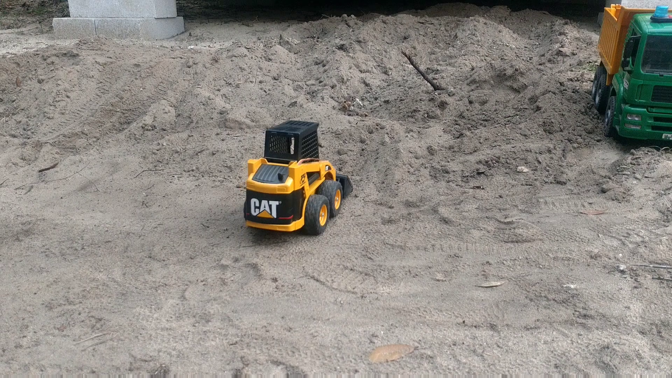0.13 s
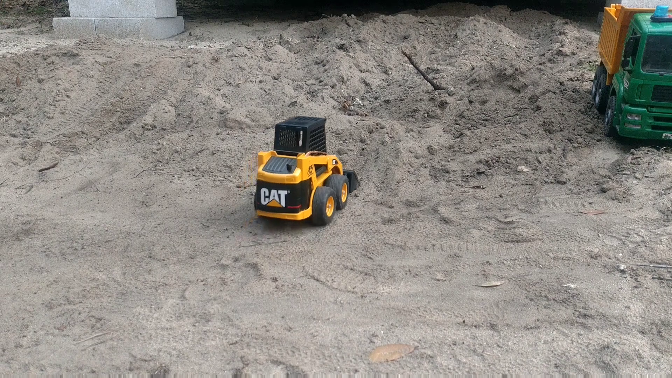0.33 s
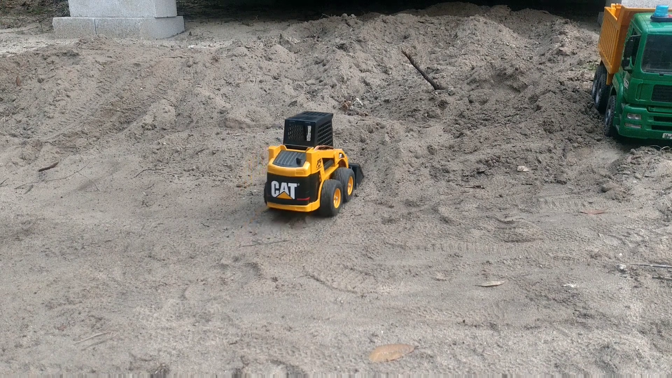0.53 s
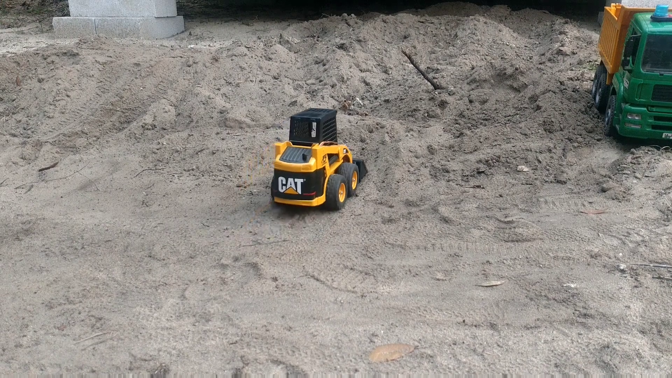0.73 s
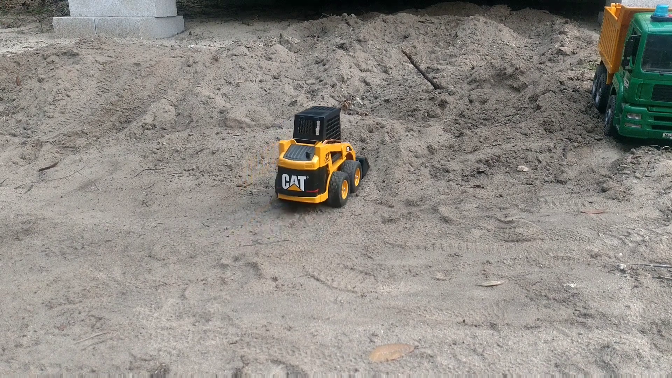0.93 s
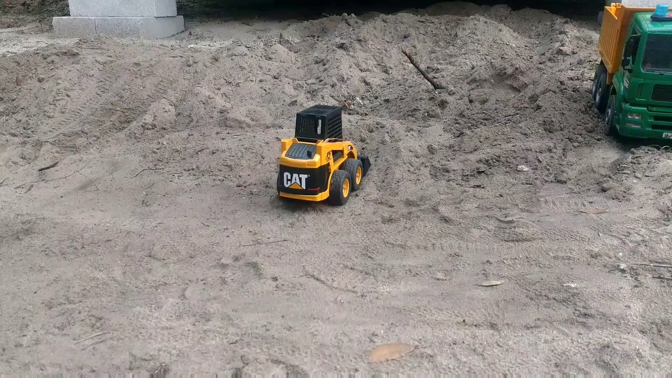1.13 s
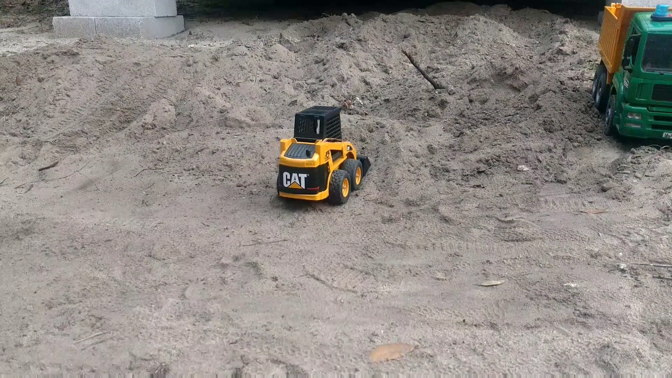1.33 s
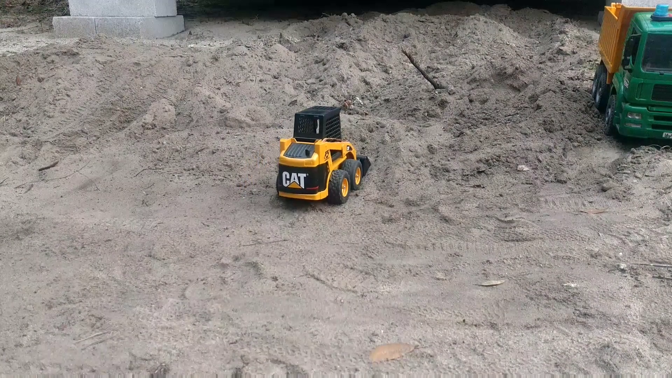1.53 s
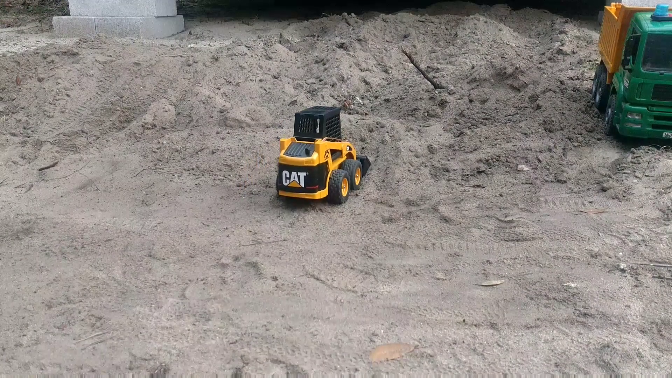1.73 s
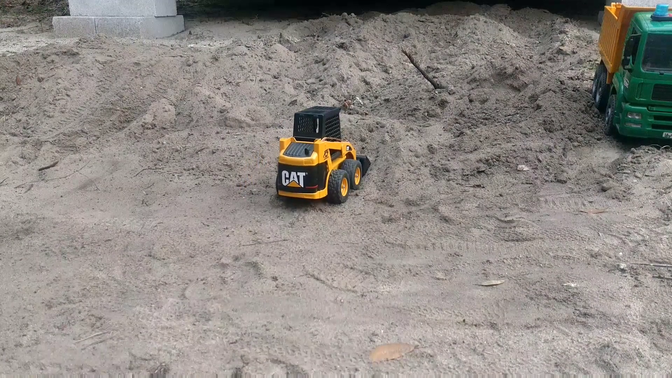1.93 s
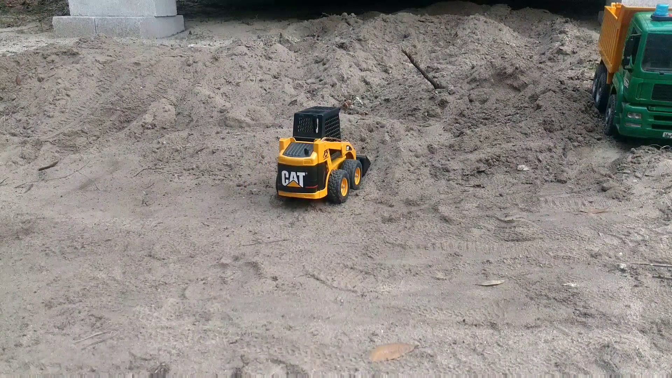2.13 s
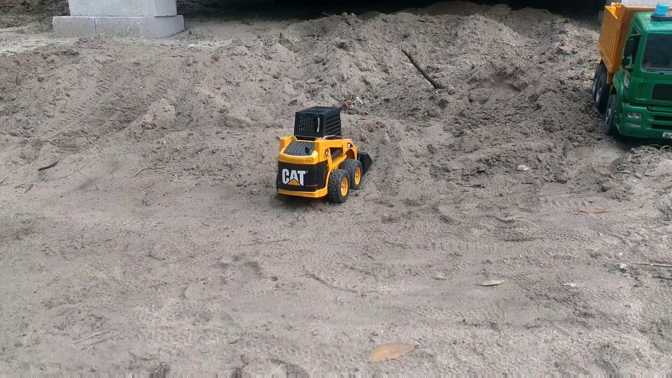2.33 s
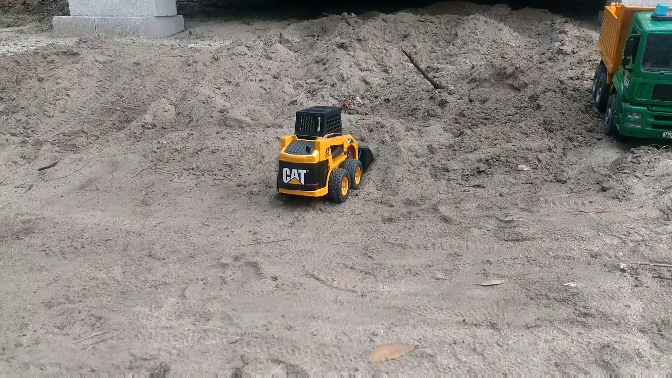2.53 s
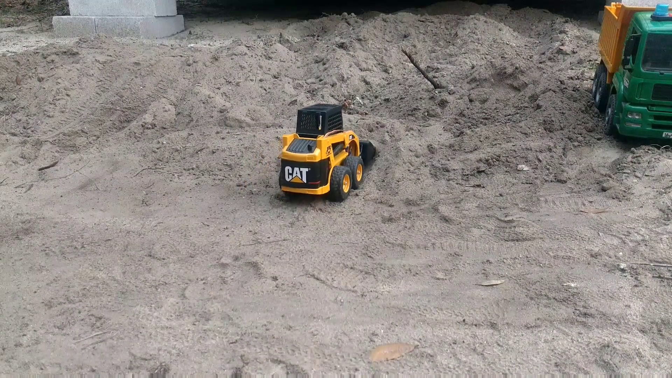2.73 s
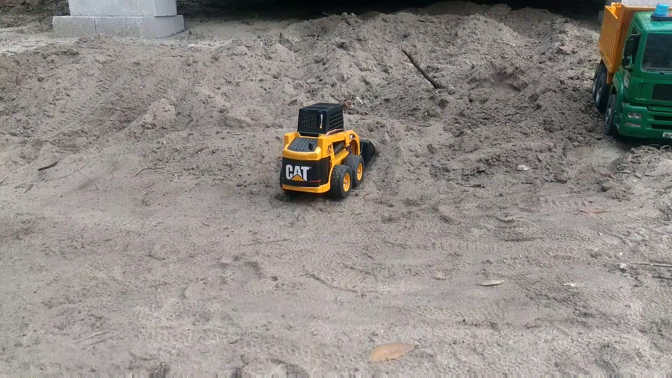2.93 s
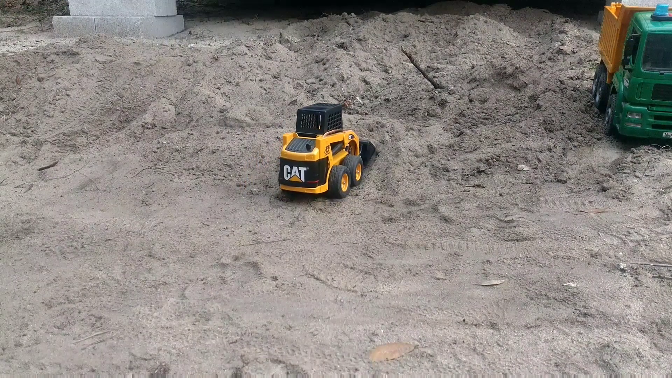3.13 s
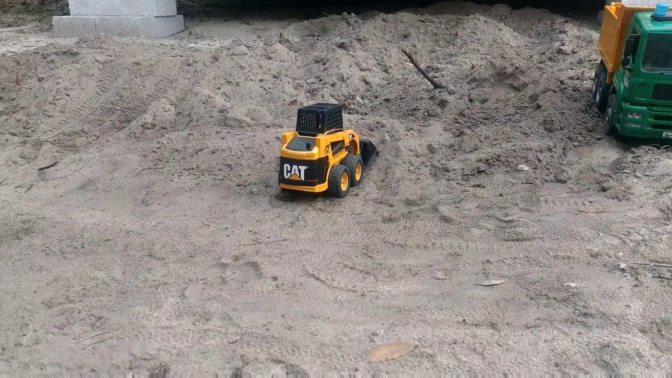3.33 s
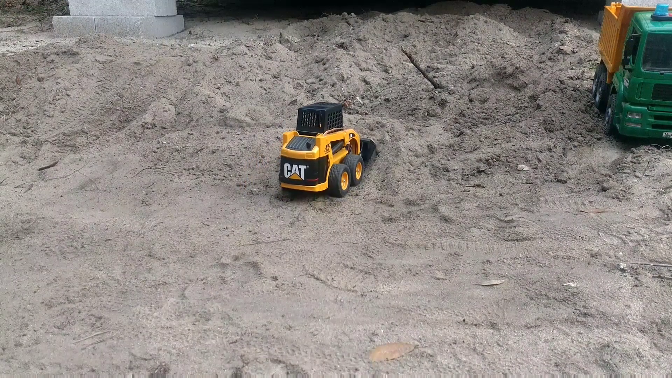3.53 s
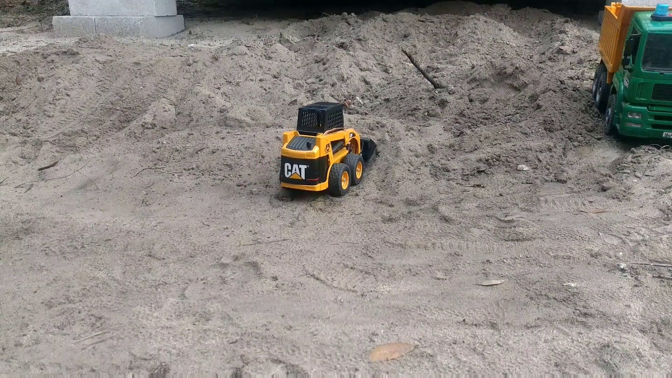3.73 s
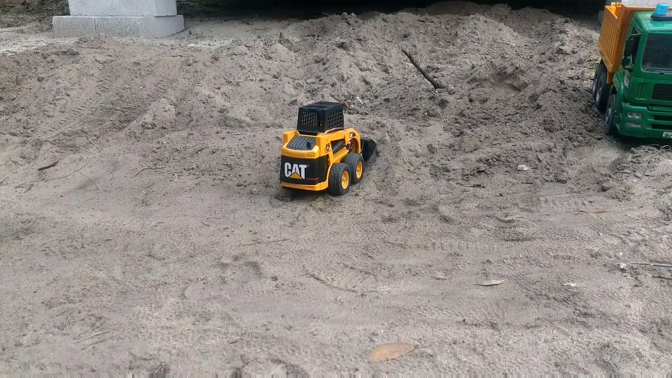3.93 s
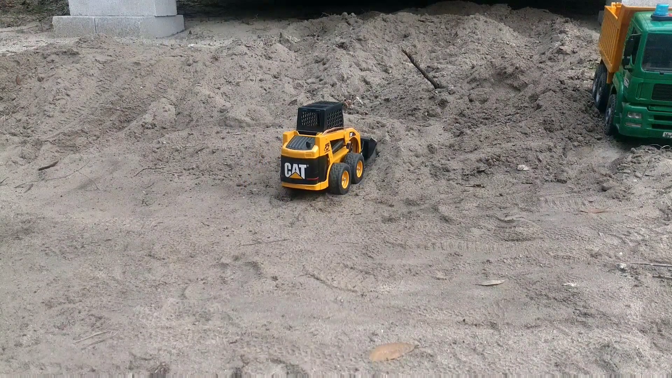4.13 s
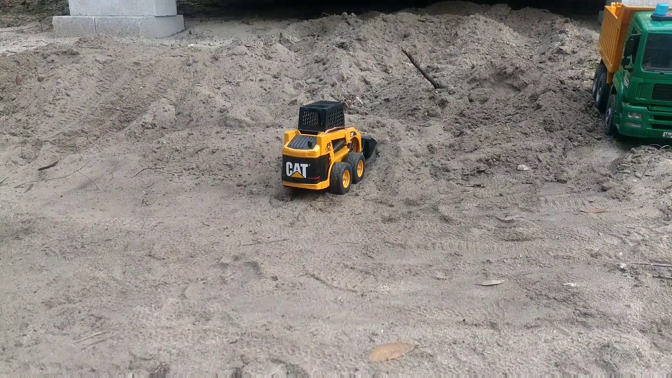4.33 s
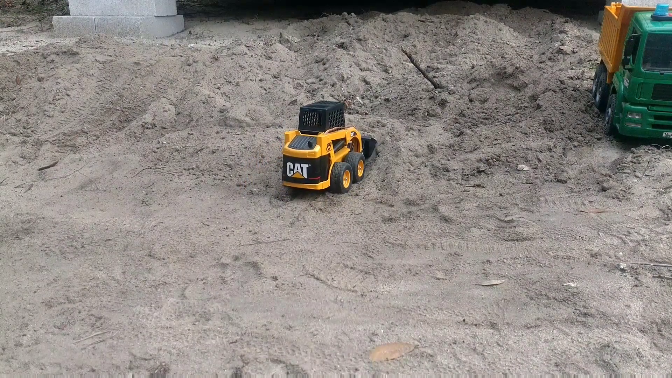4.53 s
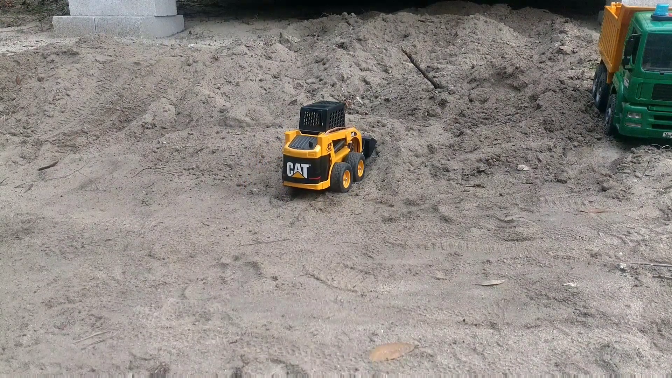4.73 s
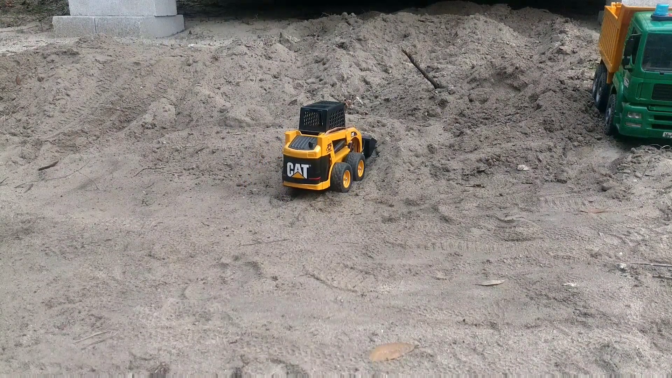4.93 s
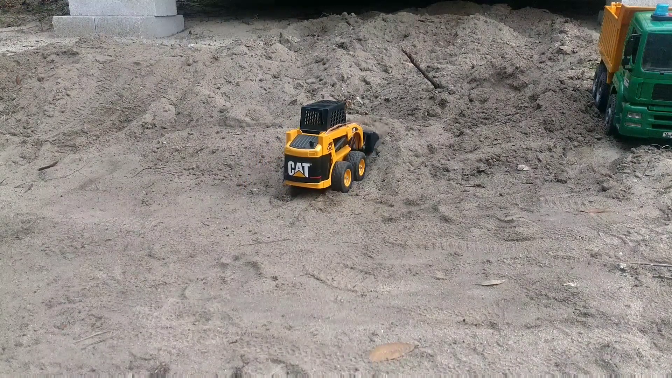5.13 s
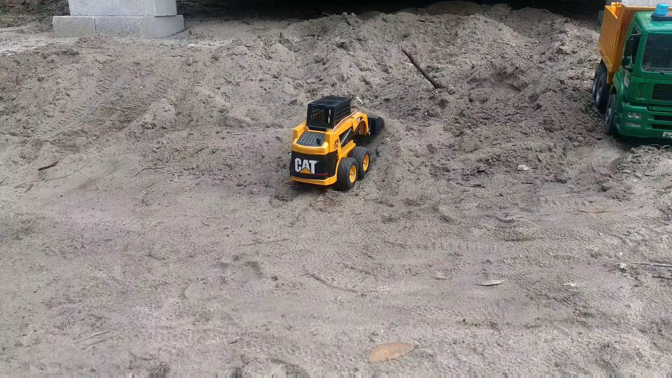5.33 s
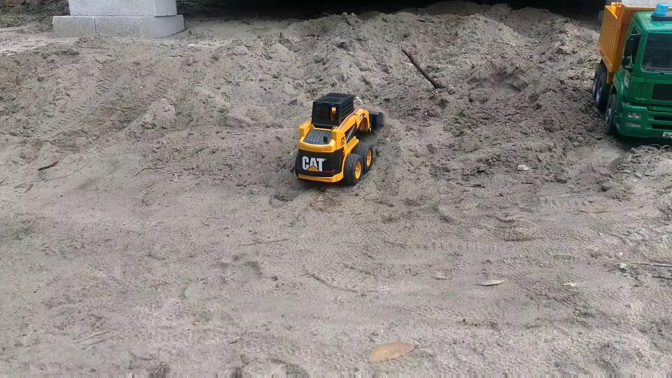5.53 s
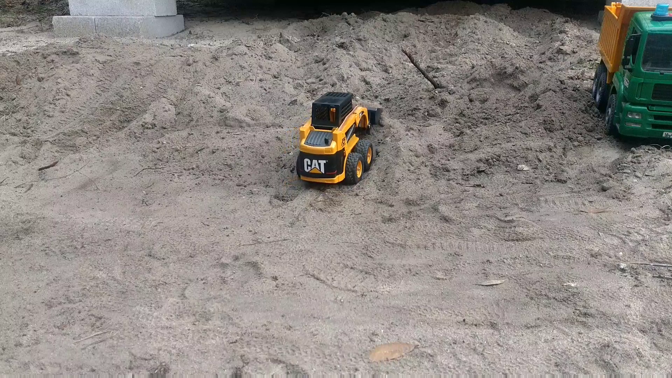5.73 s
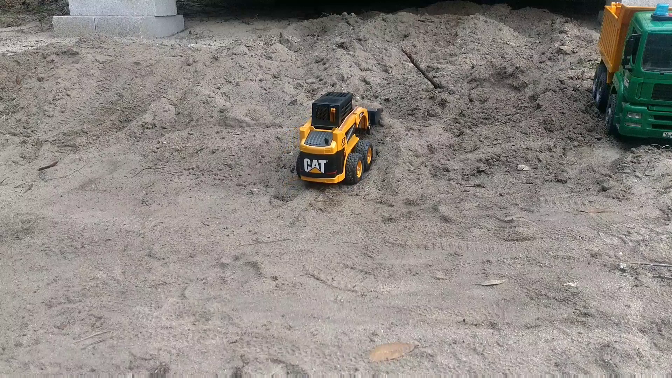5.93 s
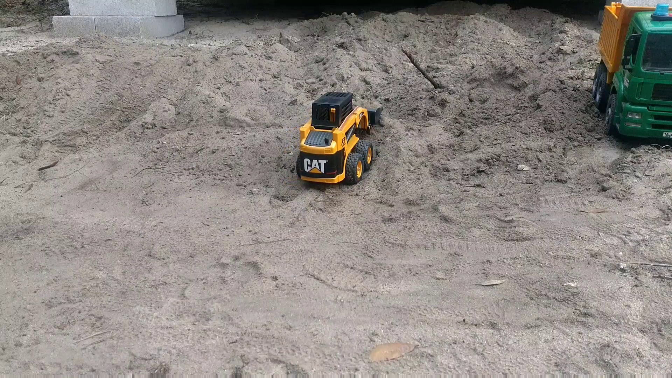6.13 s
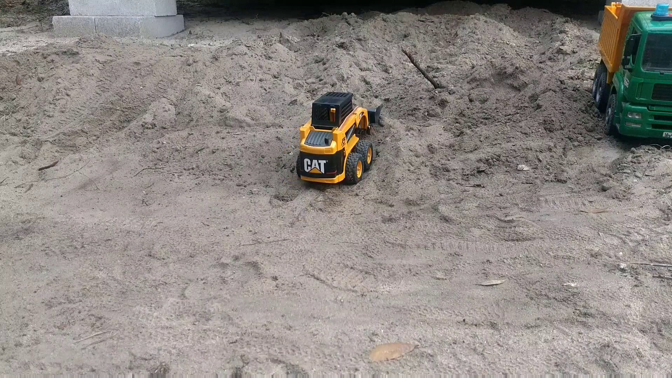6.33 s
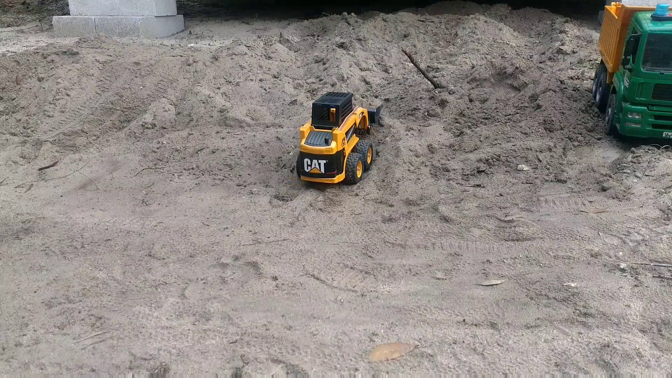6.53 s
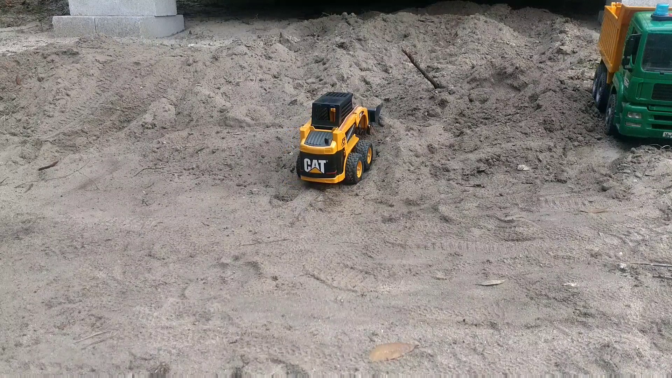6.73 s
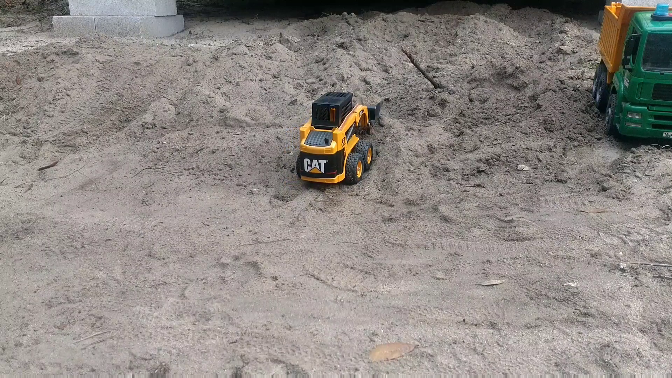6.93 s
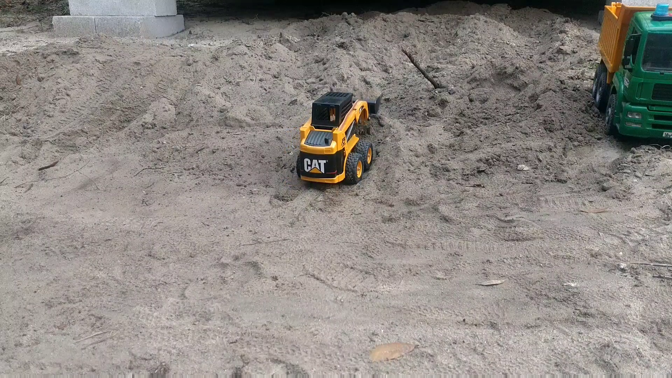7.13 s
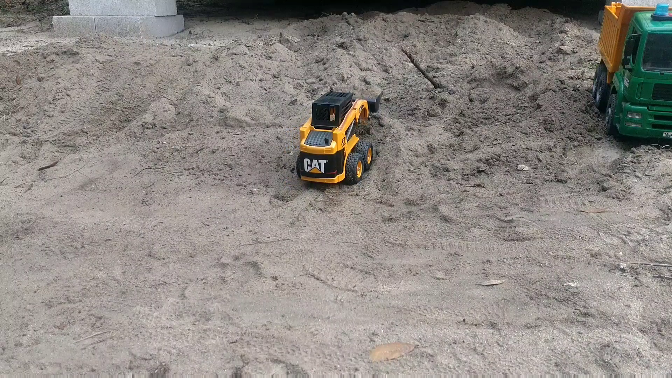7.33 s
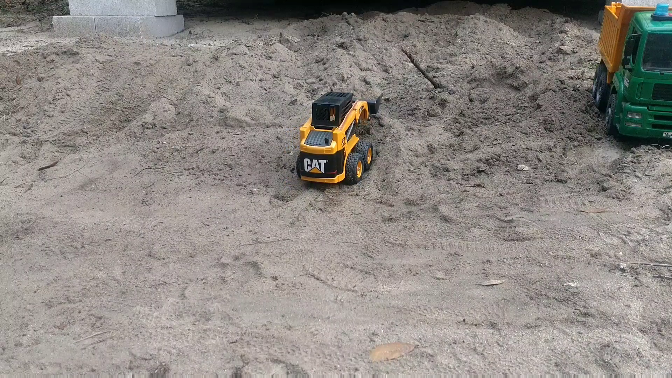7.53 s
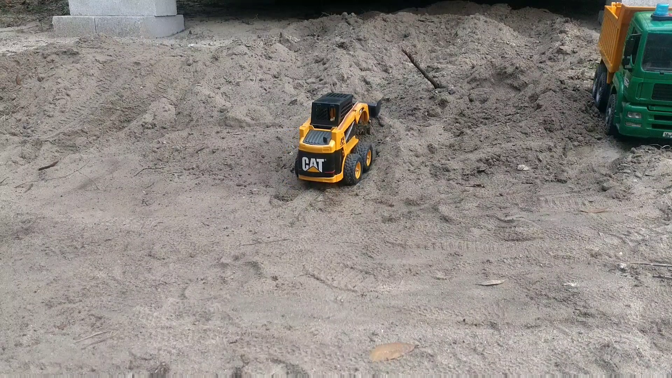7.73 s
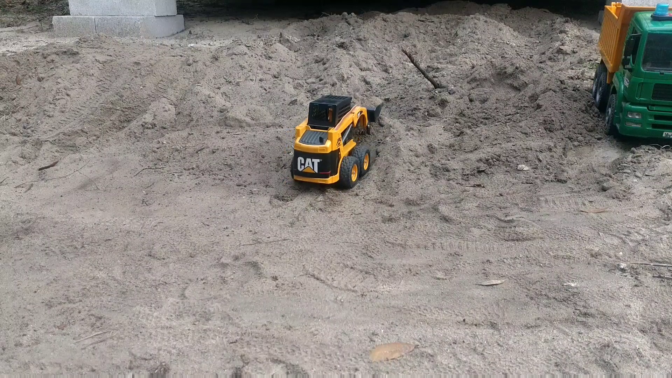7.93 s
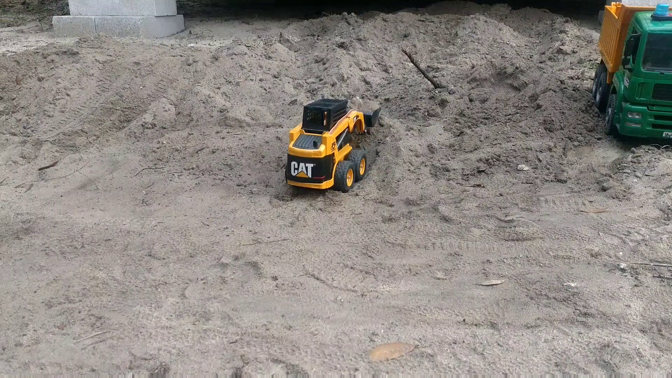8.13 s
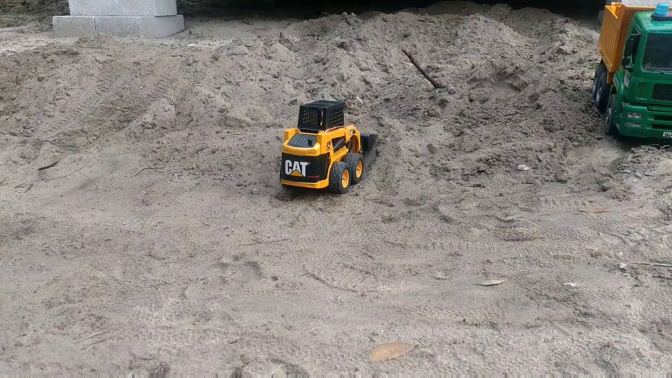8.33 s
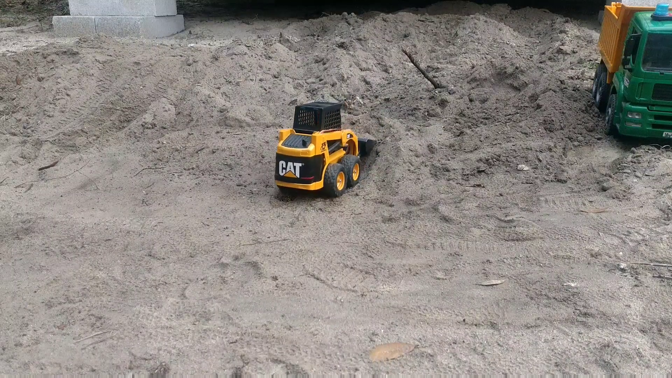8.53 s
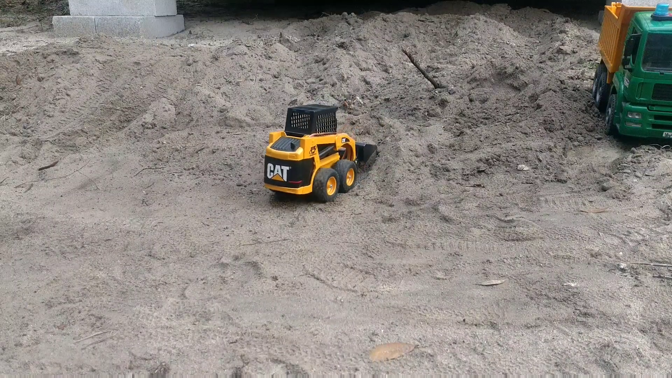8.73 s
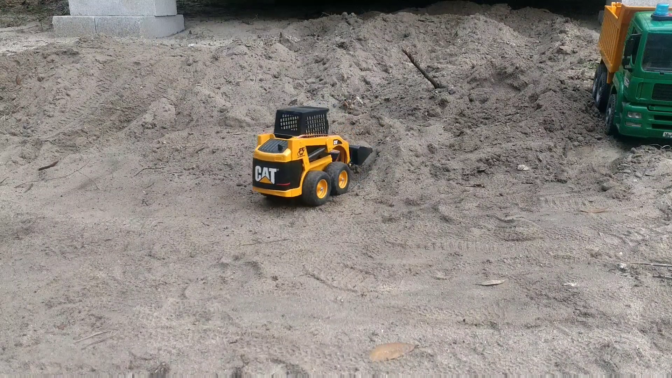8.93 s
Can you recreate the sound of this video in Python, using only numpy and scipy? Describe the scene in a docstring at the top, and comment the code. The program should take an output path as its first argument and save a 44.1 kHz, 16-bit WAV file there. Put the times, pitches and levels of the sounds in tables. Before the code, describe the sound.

A small toy loader's electric motor and plastic gears whir and rattle over sand, pause for clicking servo twitches, then whir again as a distant engine accelerates.

```python
"""A small radio-controlled toy loader whirs over sand: tooth knocks ring its plastic shell, gear meshes
whine as jittery sines, and the motor current pulses both. Between runs a bucket servo twitches in bursts
of tooth clicks, thuds once and ticks on the pulses. Far off an engine climbs through its gears as
wavering crank orders, over rumble and hiss. Wind bumps a stereo microphone as short low lumps.
The two sides are out of step and of opposite sign."""
import sys
import numpy as np
from scipy import signal
from scipy.fft import rfft, irfft
from scipy.io import wavfile
from scipy.ndimage import uniform_filter1d

SR = 44100
rng = np.random.default_rng(int(sys.argv[2]) if len(sys.argv) > 2 else 0)


def waveform_to_disk(signal):
    """Save audio, clipped to [-1, 1], as 16-bit WAV at the path in sys.argv[1]."""
    frames = np.transpose(np.atleast_2d(signal))
    scaled = np.clip(frames, -1, 1) * 32767
    samples = np.round(scaled).astype(np.int16)
    wavfile.write(sys.argv[1], SR, samples)


N = 396900
T, HZ = np.arange(N) / SR, np.fft.rfftfreq(N, 1 / SR)
PULSE_S, PULSE_AT = .022, 7.742  # period of the motor current pulses and one pulse time [s]
FADE_FROM_S, FADE_TO_S = 0.067, 0.43

# motor runs, one table each: (time [s], gear rattle level [dB], gearbox drone minus rattle [dB])
MOTOR_RUNS = [
    [(.4, -29, -11), (1, -32.5, -8), (1.4, -34, -8), (1.77, -35.5, -9), (2.15, -35.5, -8),
     (2.35, -42.5, -3.5), (2.41, -39, -5), (2.55, -45, -5), (2.62, -36, -6), (2.8, -30, -9.5),
     (3.4, -31, -10.5), (5.1, -32.5, -9.5), (5.62, -33, -11), (5.76, -54, -13)],
    [(7.6, -59, -22), (7.7, -44.5, -9.5), (7.92, -35.5, -8.5), (8.52, -36.5, -10), (8.67, -33, -7.5),
     (9, -32.5, -8)],
]


def amp(db):
    """Decibels to an amplitude factor."""
    return 10 ** (np.asarray(db) / 20)


def evened(x):
    """Scales x to an rms of 1 over all its rows."""
    return x / np.sqrt(np.mean(x ** 2) + 1e-20)


def read(points, hz):
    """Reads a frequency curve, straight between its points on a log pitch axis."""
    f, value = np.transpose(points)
    return np.interp(np.log(hz + 1), np.log(f + 1), value)


def columns(rows, edge_s):
    """Every column over time, and a window that closes outside the table."""
    s, *rest = np.transpose(rows)
    window = np.interp(T, [s[0] - edge_s, s[0], s[-1], s[-1] + edge_s], [0, 1, 1, 0])
    return [np.interp(T, s, c) for c in rest], window


def wander(per_s, channels=1):
    """Slow random drift: straight lines between unit normal draws."""
    count = int(N / SR * per_s) + 2
    draws = rng.standard_normal((channels, count))
    return np.array([np.interp(T * per_s, np.arange(count), row) for row in draws])


def ring(x, modes):
    """Resonances whose powers add, in minimum phase: each starts with the blow and dies away."""
    hz = np.fft.fftfreq(4096, 1 / SR)
    power = sum(amp(2 * db) / (1 + (2 * (abs(hz) - f) / w) ** 2) ** 2 for f, w, db in modes)
    log_gain = np.log(power) / 2
    taps = np.fft.ifft(np.exp(np.conj(signal.hilbert(log_gain)))).real[:2048]
    return signal.oaconvolve(x, taps[None], axes=1)[:, :x.shape[1]]


def knocks(per_s, spread_db):
    """Three unrelated trains of tiny tooth knocks, a few of them large."""
    size = amp(spread_db * np.minimum(rng.exponential(1, (3, N)), 5))
    sign = rng.choice([-1., 1.], (3, N))
    return size * sign * (rng.random((3, N)) < per_s / SR)


def patchy(x, patchy_db):
    """Parts of the shell wake by turns: random patches of level over time and pitch."""
    z = signal.stft(x, nperseg=256)[2]
    patches = uniform_filter1d(rng.standard_normal(z.shape[1:]), size=4, axis=0)
    patches = uniform_filter1d(patches, size=16, axis=1)
    return signal.istft(z * amp(patchy_db * evened(patches)), nperseg=256)[1][:, :N]


def throb(at_s, sharp):
    """The current comes in pulses, so the torque swells once a period; mean 1."""
    swell = np.exp(sharp * np.cos(2 * np.pi * (T - at_s) / PULSE_S))
    return swell / swell.mean()


def pulse_steps(lead_s):
    """One unit impulse per current pulse, early by lead_s; the very first sample is to be gated off."""
    return np.diff(np.floor((T - PULSE_AT + lead_s) / PULSE_S), prepend=0)


def heard(trains):
    """Row 0 reaches both sides, the left late and inverted; rows 1 and 2 scatter to left and right."""
    # (frequency [Hz], share of power unrelated between the sides [0-1])
    scatter = [(60, 0.98), (400, 0.99), (800, 0.01), (6000, 0.03), (7500, 0.5), (10000, 0.63), (15000, 0.4)]
    # (frequency [Hz], gain of the left-right difference [dB])
    side_gain = [(60, -1), (300, 1), (800, -14.5), (3000, -9.5), (6000, -4), (8000, -1.5), (16000, 2)]
    # (frequency [Hz], boost of left over right [dB])
    tilt = [(60, 0.5), (200, 5.5), (500, 5.5), (800, -2), (7000, 0.5), (8500, -7), (12500, -5), (14000, 0)]
    lag_s, lag_top_hz = 0.0004616, 9280  # the delay stops adding phase above this frequency
    common, left, right = rfft(trains)
    loose = np.clip(read(scatter, HZ), 0, 1)
    late = np.exp(-2j * np.pi * np.minimum(HZ, lag_top_hz) * lag_s)
    left = np.sqrt(loose) * left - np.sqrt(1 - loose) * common * late
    right = np.sqrt(loose) * right + np.sqrt(1 - loose) * common
    mid, side = (left + right) / 2, (left - right) / 2 * amp(read(side_gain, HZ))
    lean = amp(read(tilt, HZ) / 2)
    return irfft(np.array([(mid + side) * lean, (mid - side) / lean]), N)


def air():
    """Far traffic rumble and hiss: shaped noise that swells very slightly."""
    # (frequency [Hz], relative level per Hz [dB])
    spectrum = [(30, -19), (60, -5), (100, -2), (150, 2.5), (300, -7.5), (500, -12), (900, -17.5),
                (2000, -20.5), (4000, -22), (8000, -30), (16000, -38.5)]
    wash = irfft(rfft(rng.standard_normal((3, N))) * amp(read(spectrum, HZ)), N)
    return amp(-49.5 + 0.048 * wander(2.4)) * evened(wash)


def wind():
    """Wind on the grille: short low lumps, opposite on the two sides."""
    # (centre time [s], level before the side gains [dB], frequency [Hz])
    lumps = [(.44, -43, 85), (.82, -36, 90), (1.627, -33, 97), (1.695, -35, 64.5), (1.745, -38, 90),
             (1.762, -23, 100), (1.812, -36, 60)]
    out = np.zeros(N)
    for s, db, hz in lumps:
        u = (T[:SR // 5] - .1) * hz  # cycles from the centre
        lump = amp(db) * np.exp(-(u / 1.2) ** 2) * np.cos(2 * np.pi * u)
        out[round((s - .1) * SR):][:len(u)] += lump
    return out * [[1.15], [-.85]]


def engine():
    """Crank orders as wavering sines through the exhaust, with a low roar; stronger on the left."""
    # far engine climbing in three gears: (time [s], crank speed [Hz])
    crank = [(.4, 16.8), (1.56, 26.4), (2.32, 32.5), (2.82, 22.6), (4.07, 26.1), (5.8, 34.4), (6.05, 35.4),
             (6.47, 26), (9, 32)]
    # before the side gains: (time [s], orders below 6 [dB], ninth order [dB], other upper orders [dB])
    loudness = [(.4, -75, -70, -60), (1.2, -53, -66, -59), (1.7, -49, -64, -56), (2.3, -50, -60, -50),
                (2.55, -56, -60, -46), (2.82, -57, -62, -54), (4.3, -49.5, -50, -50),
                (5.05, -50.5, -57, -48), (5.25, -50.5, -46, -47), (6.03, -45, -42, -42),
                (6.25, -55, -51, -43), (6.46, -49.5, -51, -46), (7.6, -56, -51, -48),
                (7.8, -46.5, -46, -46), (9, -45, -45, -46)]
    # (multiple of the crank speed, offset from its loudness [dB])
    orders = [(4, -12.5), (5, 2), (6, -8), (7, -6.5), (8, -17), (9, -3), (10, -10.5), (11, -15.5),
              (12, -11), (14, -12.5), (16, -18.5), (18, -20.5)]
    # (frequency [Hz], exhaust gain [dB])
    exhaust = [(150, 0.5), (220, -2.5), (270, 0), (350, -9), (420, 3), (500, -8), (650, -12)]
    first_upper, ninth, roar_db = 6, 9, -12
    curves = columns(crank, edge_s=.1)[0] + columns(loudness, edge_s=.1)[0]
    # all of it is low, so a twentieth of the samples will do
    hz, low_db, ninth_db, high_db = [curve[::20] for curve in curves]
    turns = np.cumsum(hz) * 20 / SR
    # throttle shut while the gear changes
    coasting = uniform_filter1d(1. * (np.gradient(hz) < 0), size=200)
    out = np.zeros((2, len(hz)))
    for k, order_db in orders:
        if k < first_upper:
            level_db = low_db
        else:
            level_db = (ninth_db if k == ninth else high_db) - 11 * coasting
        db = level_db + order_db + read(exhaust, k * hz) + 3.0 * wander(3.5)[:, ::20]
        side_phase = np.array([[0], [1.3]])  # the right side is out of step [rad]
        out += amp(db) * np.sin(2 * np.pi * (k * turns + rng.random()) + side_phase)
    b, a = signal.butter(1, [.17, .36], "band")
    roar = evened(signal.lfilter(b, a, rng.standard_normal(out.shape)))
    out = out + amp(high_db + roar_db) * roar
    return signal.resample_poly(out, 20, 1, axis=1)[:, :N] * amp([[4.5], [-3.5]])


def servo_twitches():
    """Evenly spaced tooth clicks in grit, and the push of each twitch in three bands."""
    # before the case: (time [s], level [dB], treble tilt, part of it per band [dB], length [s])
    twitches = [(5.763, -46, -11, 0.011), (5.788, -39, 0, 0.013), (5.809, -40, -3, 0.015),
                (5.828, -35, -2, 0.021), (5.851, -37, -2, 0.017), (5.879, -41, 6, 0.013),
                (5.9, -47, -6, 0.0094), (5.92, -44.5, 6, 0.0094), (5.945, -48, -11, 0.01),
                (5.963, -43, 1, 0.014), (5.987, -40.5, 1.5, 0.011), (6.007, -42, -4, 0.011),
                (6.0195, -46, 2, 0.0045), (6.0315, -42, 2, 0.0036), (6.04, -40.5, -1, 0.034),
                (6.177, -39, -16, 0.0068), (6.202, -37.5, 0, 0.02), (6.2266, -30.5, 1.5, 0.015),
                (6.248, -37, -1, 0.019), (6.265, -40.5, 0, 0.055), (6.314, -36.5, 0, 0.025),
                (6.332, -35.5, -1, 0.026), (6.362, -39, -2, 0.0072), (6.376, -34, -6, 0.03)]
    # grit between the clicks, one row each for the common, left and right train: (level [dB])
    grit_db = [
        [-4],
        [-4],
        [-1],
    ]
    tooth_s = .0028  # spacing of the tooth clicks
    teeth = amp(grit_db) * evened(knocks(per_s=2600, spread_db=1.5))
    middle = np.array([s + length / 2 for s, _, _, length in twitches])[:, None]
    steps = np.arange(-8, 9) + .2 * rng.standard_normal((len(twitches), 17))
    inside = abs(steps) * tooth_s < .6 * np.array(twitches)[:, 3:]
    at = np.round((middle + steps * tooth_s) * SR).astype(int)[inside]
    clicks = np.sqrt(tooth_s * SR) * amp(3.0 * rng.standard_normal((3, *steps.shape)) - 4)
    teeth[:, at] += clicks[:, inside]
    push = np.zeros((3, N))
    for s, db, treble_db, length in twitches:
        length = max(length, .003)
        u = np.arange(0, 3 * length, 1 / SR) / length
        shape = np.sin(np.pi * np.minimum(u, 1)) + 0.5 * u * np.exp(-1.6 * u)  # push, then a tail
        bands_db = [[db], [db + 0.49 * treble_db], [db + 0.81 * treble_db]]
        push[:, round(s * SR):][:, :len(u)] += amp(bands_db) * shape
    return teeth, push


def servo_ticks():
    """The held servo ticks on the current pulses, faintly at first; impulses in three bands."""
    # before the case: (time [s], level [dB], treble tilt, scaled per band [dB])
    strong_ticks = [(7.192, -45, -21), (7.214, -50, -15), (7.236, -44, -19), (7.258, -52, -13),
                    (7.280, -47, -17), (7.302, -51, -16), (7.324, -46, -18), (7.346, -49, -15),
                    (7.368, -62, -14), (7.390, -43.5, -13), (7.412, -46, -14), (7.434, -43.5, -11),
                    (7.456, -43, -12), (7.501, -47, -14), (7.521, -42.5, -10.5), (7.543, -43, -10),
                    (7.566, -51, -14), (7.587, -55, 2), (7.610, -45, -6), (7.632, -49, -1),
                    (7.654, -45, -13), (7.676, -44, -7)]
    start, end, db, treble_db = 6, 7.18, -58, -4  # faint ticks: from [s], to [s], level, treble [dB]
    pulses = pulse_steps(lead_s=0.00095) * amp(1.2 * wander(45.)[0])
    faint_db = [[db], [db + treble_db], [db + 1.5 * treble_db]]
    ticks = pulses * (T > start) * (T < end) * amp(faint_db)
    for s, db, treble_db in strong_ticks:
        ticks[:, round(s * SR)] += amp([db, db + 0.65 * treble_db, db + 1.4 * treble_db])
    return ticks


def bucket_thud():
    """The bucket meets the sand: one quickly dying low thump."""
    s, db, hz = 6.358, -31, 460
    u = np.maximum(T - s, 0) * hz
    return amp(db) * u * np.exp(-u / 0.81) * np.sin(2 * np.pi * u)


def servo():
    """Twitches, and ticks that each knock twice in a brief scrape, ring the servo case band by band."""
    # servo case: (frequency [Hz], width [Hz], level [dB])
    case = [(3310, 510, -9), (3810, 380, -4), (5460, 1300, 0), (7300, 1800, 2), (9800, 1400, -4.5),
            (12900, 6300, -5.5)]
    rebound_s, scrape_s, scrape_db, knock_db = .003, .008, -6, 19.5
    teeth, push = servo_twitches()
    ticks = servo_ticks()
    half = round(rebound_s / 2 * SR)
    scrape = rng.standard_normal((2, N))[[0, 0, 1]]
    puff = amp(scrape_db) * np.hanning(round(scrape_s * SR))[None]
    out = 0
    for p, tick, modes, db in zip(push, ticks, (case[:2], case[2:3], case[3:]), (-7.5, -9, -11)):
        unit = np.std(ring(scrape[:, :SR], modes))  # evens the bands
        out += amp(db) * ring(p * teeth, modes) / unit
        double_knock = np.roll(tick, -half) / 2 - np.roll(tick, half)  # softly out and hard back
        scraping = signal.oaconvolve(tick[None], puff, "same") * scrape
        out += ring(scraping + amp(knock_db) * double_knock, modes) / unit
    return out + bucket_thud()


def whines():
    """Mesh tones: the pitch jitters, the strength flickers and throbs with the current."""
    # one side's gear mesh, one table each time it sings: (time [s], mesh [Hz], level [dB])
    mesh = [
        [(.15, 792, -59), (.45, 798, -59), (1.29, 760, -59)],
        [(2.8, 720, -55), (2.87, 830, -53), (3.02, 930, -56), (3.1, 895, -55), (3.2, 835, -52),
         (3.27, 690, -54)],
        [(3.32, 740, -59), (3.37, 815, -54), (3.48, 835, -55), (3.55, 790, -55), (3.66, 915, -56),
         (3.8, 845, -54), (3.92, 900, -55)],
        [(4.3, 800, -60), (4.42, 900, -60), (4.5, 850, -59), (4.6, 870, -58)],
        [(5.24, 720, -55), (5.3, 895, -51), (5.41, 700, -54), (5.45, 895, -55), (5.5, 890, -55),
         (5.56, 830, -58)],
    ]
    # minus the first pair, one row each time it sings: (second gear pair [dB], sum tone [dB])
    overtones = [(15, 7), (11, -20), (8, -20), (-8, -20), (-8, -20)]
    # the other side's mesh sags under load and races when its wheels spin free:
    # (time [s], mesh [Hz], level of its octave [dB])
    slip = [(3.88, 625, -52), (3.97, 740, -43), (4.05, 760, -48), (4.16, 625, -41), (4.22, 645, -42),
            (4.25, 605, -40), (4.31, 630, -45), (4.4, 755, -44), (4.45, 770, -42), (4.55, 650, -54),
            (4.62, 585, -51), (4.68, 650, -44), (4.74, 660, -41), (4.8, 750, -50), (4.88, 780, -46),
            (4.99, 600, -41.5), (5.13, 615, -56), (5.18, 580, -39), (5.24, 700, -42), (5.35, 765, -58),
            (5.45, 650, -43), (5.52, 620, -49)]
    # its high orders whistle: (multiple of the mesh, level at top speed [dB])
    slip_orders = [(5, -43), (10, -43), (12, -41)]
    second_pair = 1.345  # ratio of the second pair's mesh to the first
    clean, fuzzy = .006, .045  # pitch jitter of a tight and of a loose mesh [share]
    tones = []
    for rows, (second_db, sum_db) in zip(mesh, overtones):
        (hz, db), on = columns(rows, edge_s=0.0053)
        fading_db = .07 * (hz.max() - hz)  # the second pair fades as the mesh slows
        tones += [(hz, db, on, clean),
                  (second_pair * hz, db + second_db - fading_db, on, fuzzy),
                  ((1 + second_pair) * hz, db + sum_db, on, fuzzy / 2)]
    (hz, octave_db), on = columns(slip, edge_s=.03)
    hz = uniform_filter1d(hz, size=900)  # the gears have inertia
    slowed_db = .08 * (770 - hz)  # loss below the top speed of 770 Hz
    tones += [(hz, -51 - slowed_db, on, clean), (2 * hz, octave_db, on, clean)]
    tones += [(k * hz, db - slowed_db, on, clean / 2) for k, db in slip_orders]
    out = np.zeros((3, N))
    for hz, db, on, loose in tones:
        jitter = wander(60. if loose == clean else 250.)[0]
        flicker = wander(20.)[0]
        phase = 2 * np.pi * np.cumsum(hz * (1 + loose * jitter)) / SR
        out[0] += on * amp(db + 3.0 * flicker) * np.sin(phase)
    return out * throb(PULSE_AT, sharp=.5)


def current():
    """Torque of the pulsed motor current, at a constant throb depth; mean 1."""
    return 1 + 0.22 * (throb(PULSE_AT, sharp=1.0) - 1)


def pace():
    """Rattle level of the runs joined into one curve, and the swell as the wheels slip [dB]."""
    # moments of slip: (time [s], swell [dB], half length [s])
    surges = [(1.6, 2.5, 0.15), (1.98, 5, 0.1), (3.073, 2.5, 0.17), (3.48, 1, 0.04), (4.006, 2.5, 0.098),
              (4.395, 2.5, 0.13), (4.867, 4, 0.094), (5.327, 4.5, 0.1)]
    (db, _), _ = columns(MOTOR_RUNS[0] + MOTOR_RUNS[1], edge_s=.1)
    return db, sum(swell_db * np.exp(-((T - s) / half) ** 2) for s, swell_db, half in surges)


def gears():
    """Tooth knocks ring the shell; drone, rattle, squeal and treble parts swell by their own amounts."""
    # plastic shell: (frequency [Hz], width [Hz], level within its part [dB])
    shell = [(1220, 130, 3), (1377, 535, 8), (1918, 240, 11), (2402, 1760, 1), (3905, 1160, 2),
             (5120, 860, -8.5), (5798, 143, 2.5), (7400, 1970, -0.5), (9005, 760, 2), (10380, 2400, -3.5),
             (12230, 1540, -1.5), (14350, 920, -4), (14700, 1200, -8.5)]
    # motor mount: (frequency [Hz], width [Hz], relative level [dB])
    mount = [(1207, 80, -5.5), (1382, 135, -5)]
    # shell squeal minus rattle: (time [s], level [dB])
    squeal_curve = [(0, -16), (1.5, -8.5), (5.7, -7.5), (7.7, -12.5)]
    # motor holding against the sand: (time [s], level [dB])
    stall = [(5.72, -74), (6.5, -77), (6.7, -68.5), (7, -71.5), (7.2, -79), (7.75, -77)]
    unevenness_db = 0.74 * wander(35.) + 0.18 * wander(120.)
    teeth = patchy(knocks(per_s=5000, spread_db=1.0) * amp(unevenness_db), patchy_db=1.5)
    grumble = evened(ring(teeth, [(760, 410, 0)]))  # the chassis, faintly
    no_bass = signal.butter(8, 1080, "high", fs=SR, output="sos")
    teeth = signal.sosfilt(no_bass, teeth)  # the small gearbox radiates no bass
    parts = shell[:3], shell[3:6], shell[6:7], shell[7:]
    drone, rattle, squeal, treble = (evened(ring(teeth, part)) for part in parts)
    run_db, swell_db = pace()
    treble_db = 3 - 0.2744 * np.clip(-28 - run_db, 0, 18)  # a slower motor sounds duller
    (squeal_db,), _ = columns(squeal_curve, edge_s=.1)
    rattle = rattle + amp(squeal_db + 2.5 * wander(32.)) * squeal  # the squeal comes and goes
    drone = drone + amp(-17.0) * grumble
    bright = (rattle + amp(treble_db) * treble) / np.sqrt(1 + amp(2 * treble_db))
    level, drone_level = np.zeros((2, N))
    for i, rows in enumerate(MOTOR_RUNS):
        (db, drone_db), on = columns(rows, edge_s=0.016)
        if i == 0:
            on = np.where(T < rows[0][0], 1, on)  # the first run is already under way
        level = level + on * amp(db + swell_db)
        drone_level = drone_level + on * amp(db + 1.49 * swell_db + drone_db)
    running = current() * (level * bright + drone_level * drone)
    (stall_db,), on = columns(stall, edge_s=0.29)
    # a stalled motor jerks once a current pulse
    jerks = pulse_steps(lead_s=0.00511) * amp(1.0 * wander(45.))
    ping = evened(ring(jerks * (T > FADE_TO_S), mount))
    hold = throb(PULSE_AT, sharp=2.5) * (drone + amp(-2) * rattle)
    hold = hold + amp(9) * ping * [[1], [0], [0]]  # the ping is common to both sides
    return running + on * amp(stall_db) * hold


def scene():
    """The toy and the air share the two-sided pickup; engine and wind bring their own sides."""
    return heard(gears() + whines() + servo() + air()) + engine() + wind()


def record(dry):
    """The microphone drops the deepest bass; a fade in, the band limit, and silence at the very start."""
    start_s, edge_hz = .079, 15730
    no_deep_bass = signal.butter(2, 48, "high", fs=SR, output="sos")
    faded = signal.sosfilt(no_deep_bass, dry) * np.interp(T, [FADE_FROM_S, FADE_TO_S], [0, 1])
    taps = signal.firwin(1023, edge_hz, window=("kaiser", 9), fs=SR)
    return signal.oaconvolve(faded, taps[None], "same") * (T > start_s)


dry = scene()
out = record(dry)
waveform_to_disk(out)
```